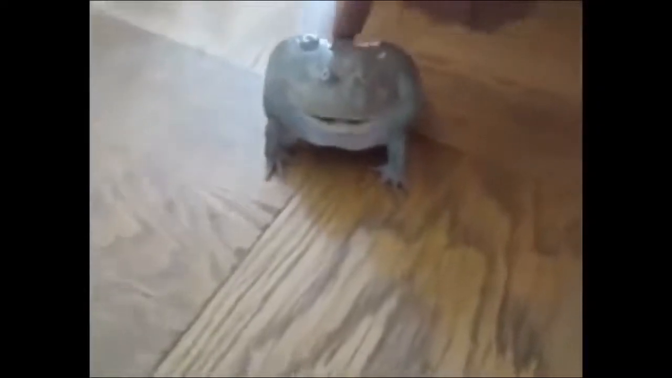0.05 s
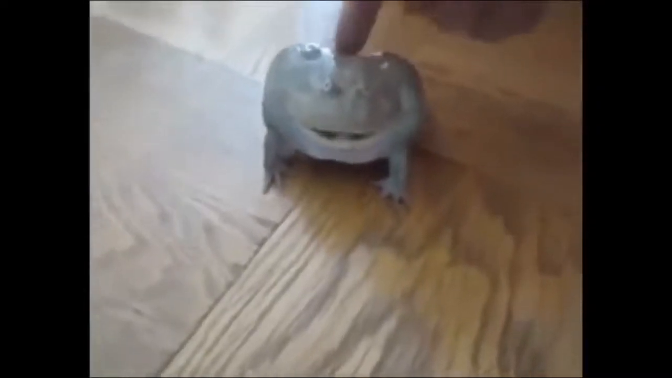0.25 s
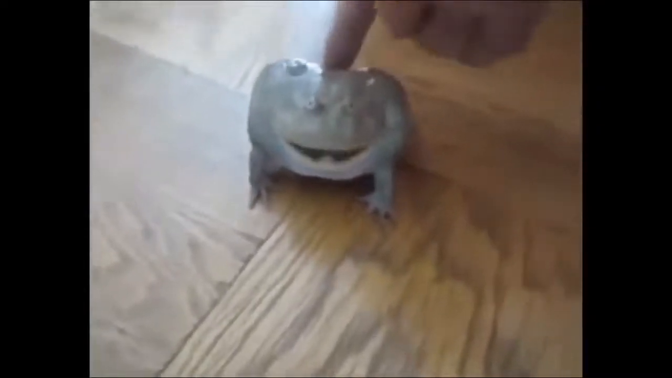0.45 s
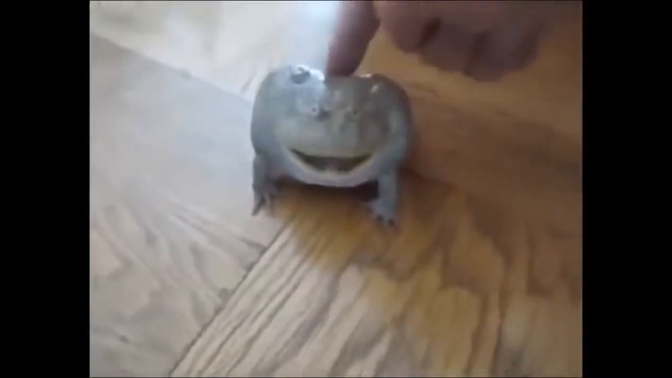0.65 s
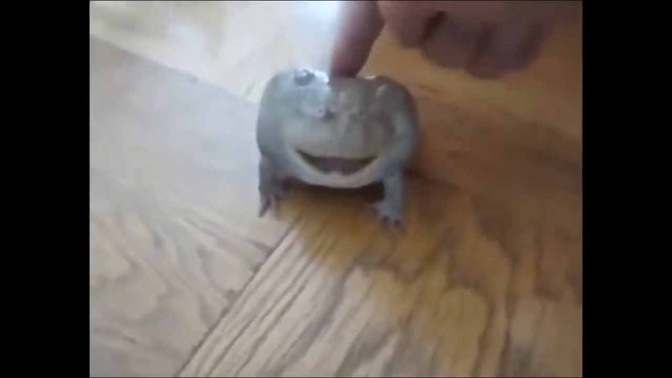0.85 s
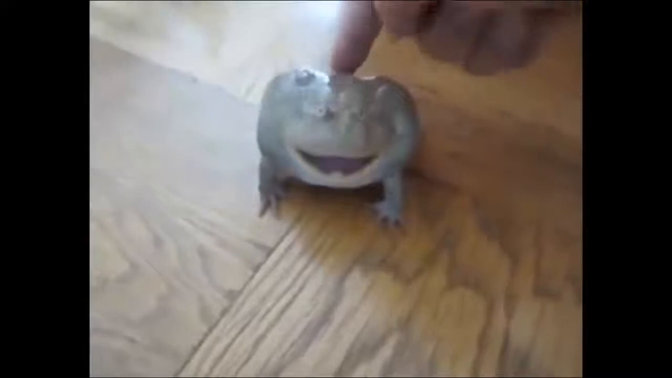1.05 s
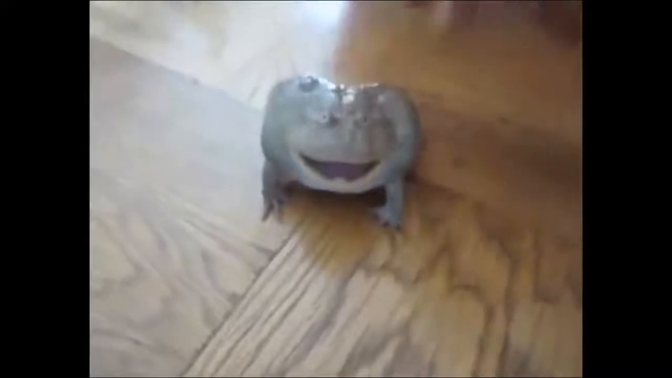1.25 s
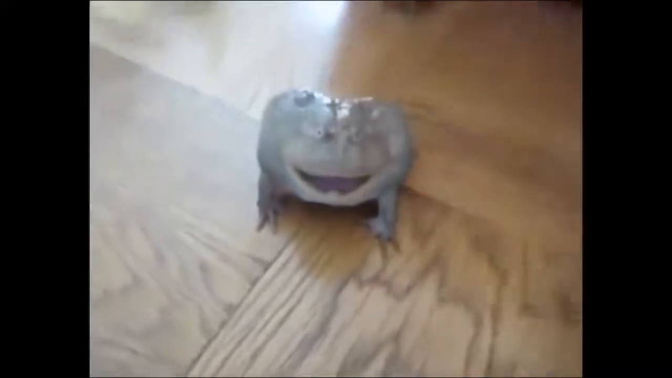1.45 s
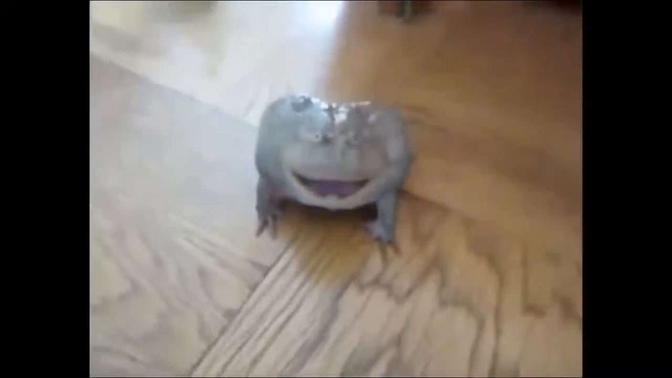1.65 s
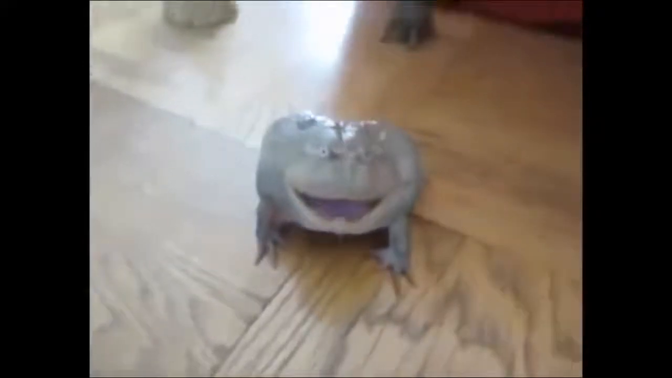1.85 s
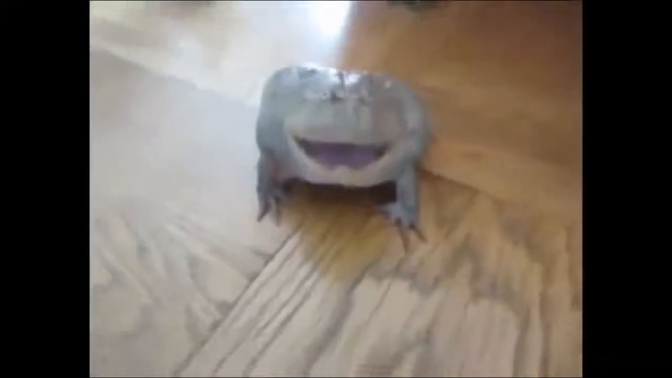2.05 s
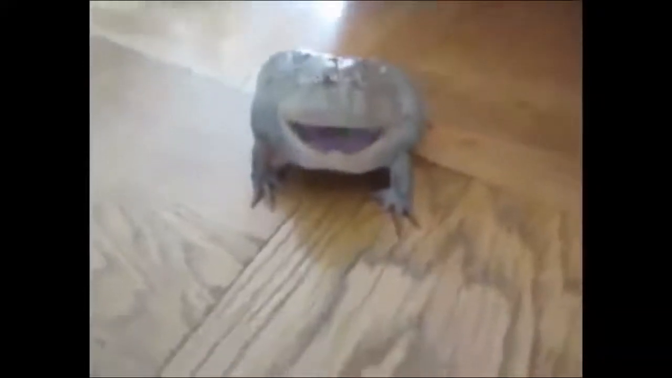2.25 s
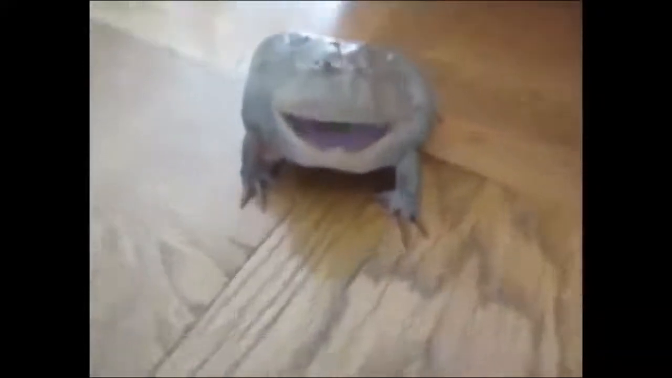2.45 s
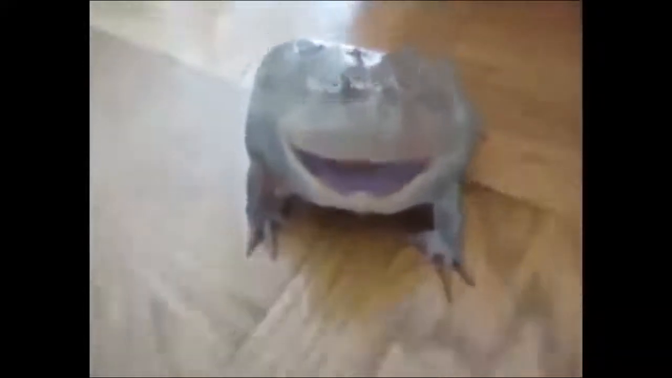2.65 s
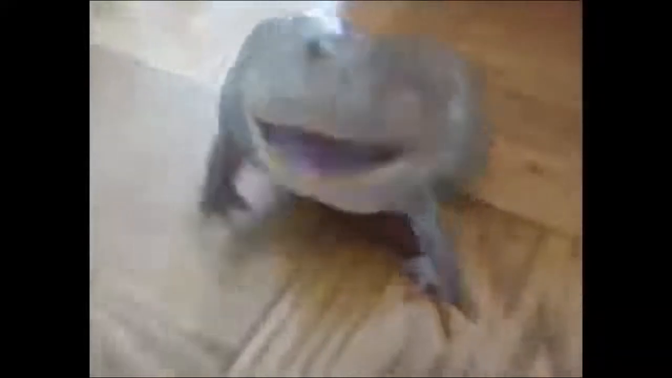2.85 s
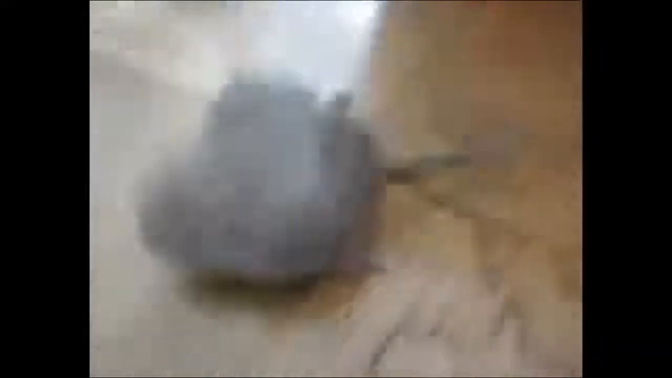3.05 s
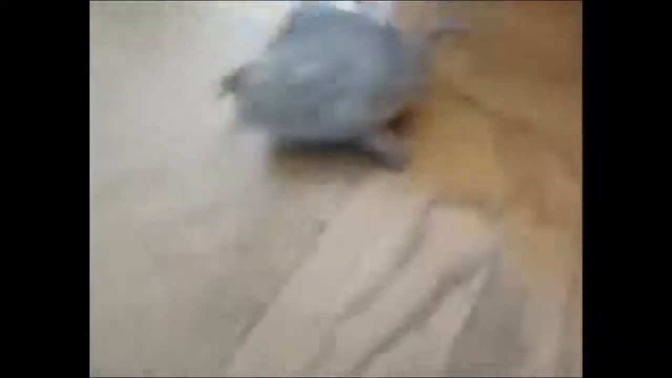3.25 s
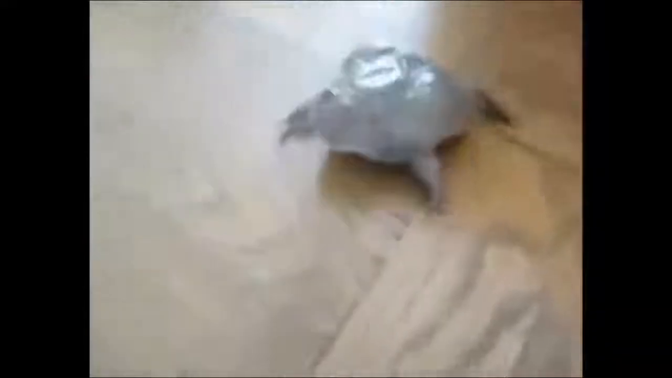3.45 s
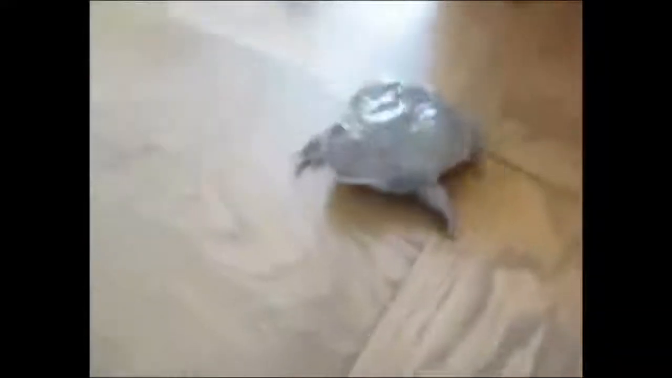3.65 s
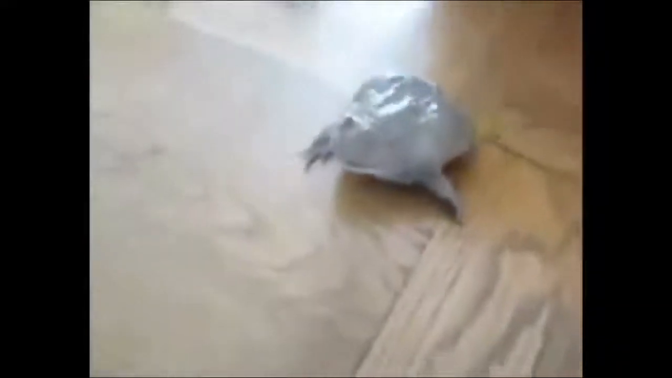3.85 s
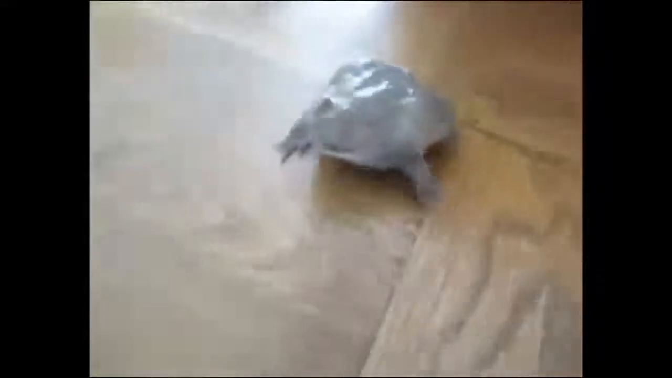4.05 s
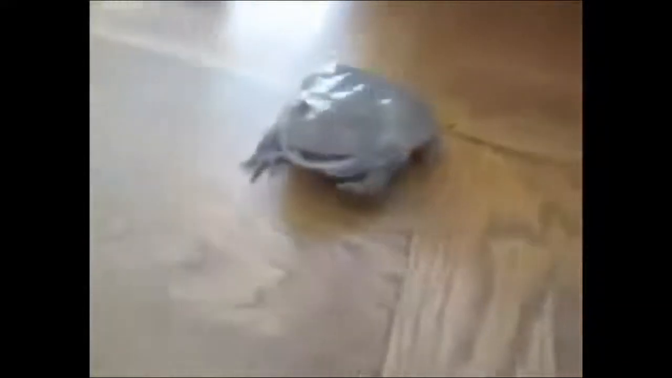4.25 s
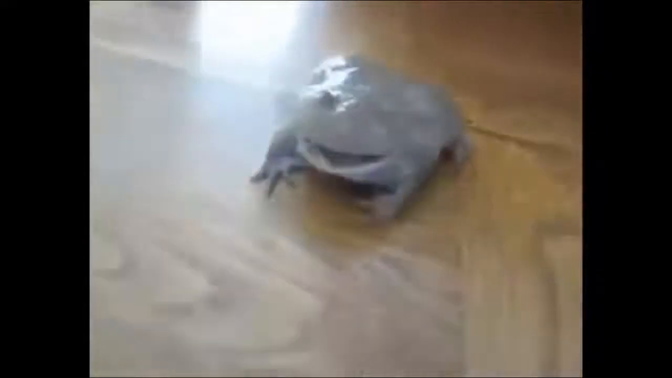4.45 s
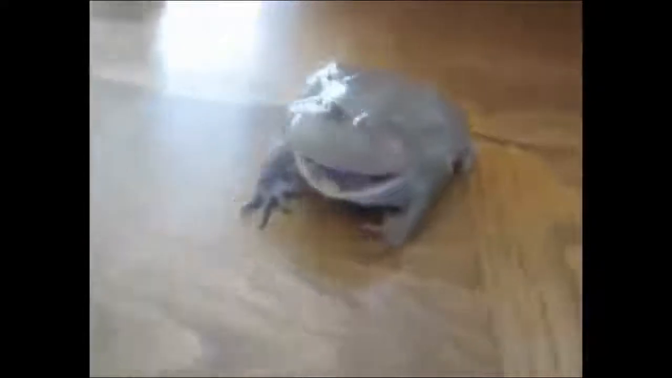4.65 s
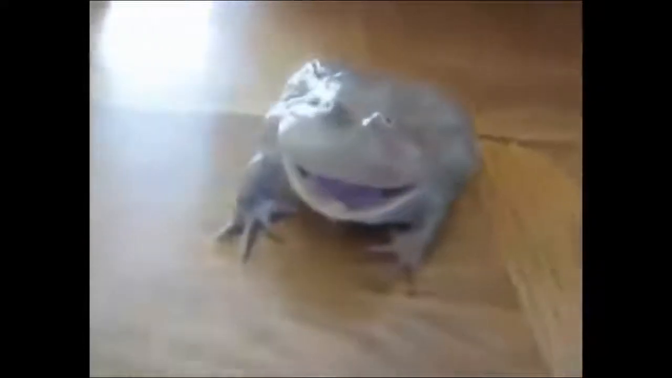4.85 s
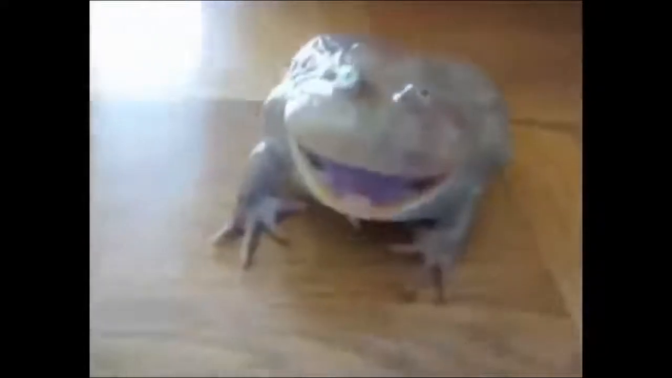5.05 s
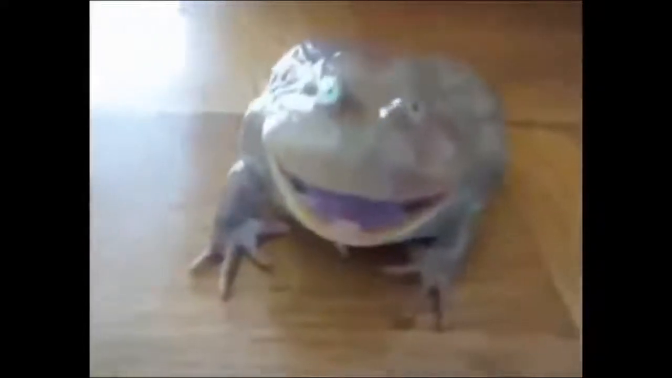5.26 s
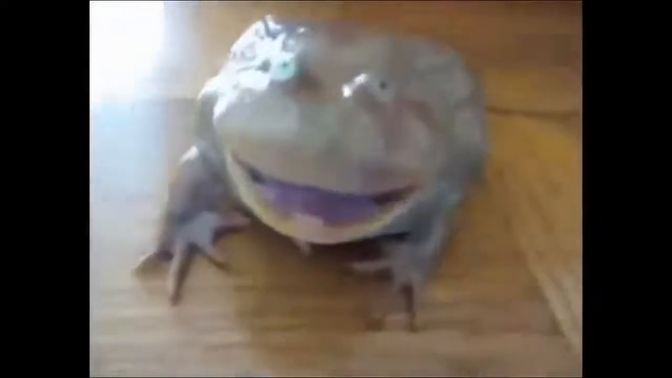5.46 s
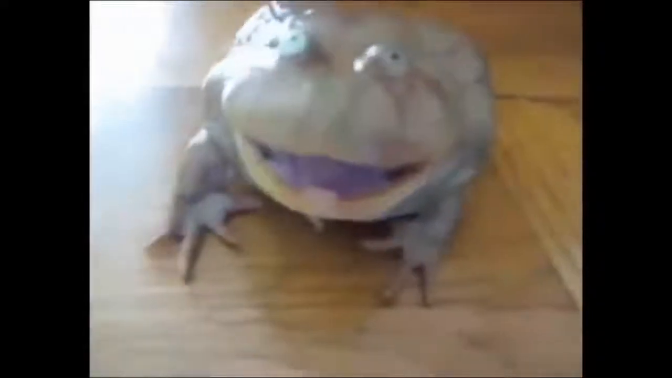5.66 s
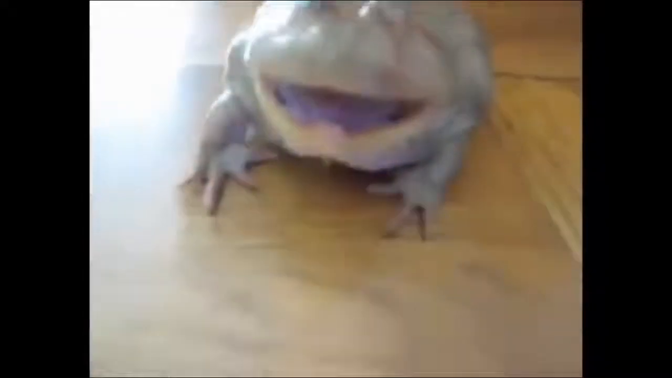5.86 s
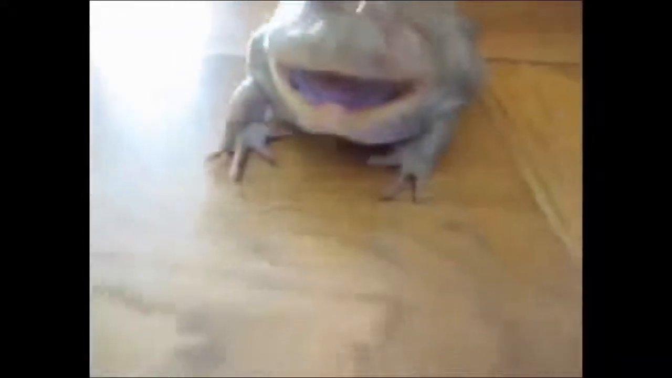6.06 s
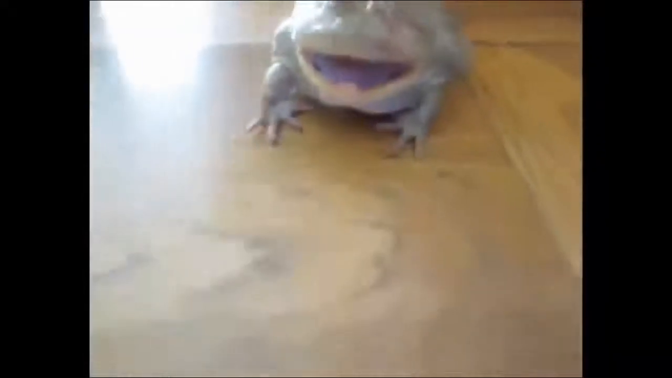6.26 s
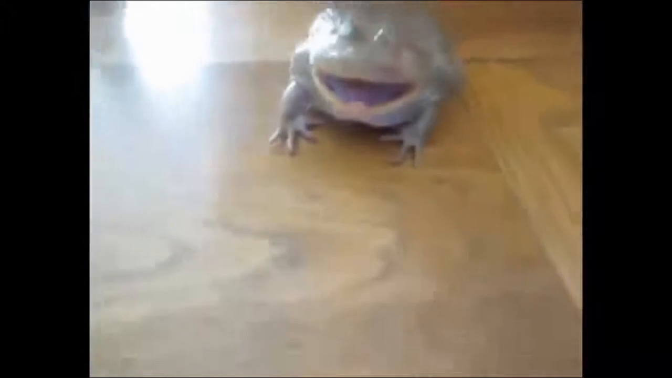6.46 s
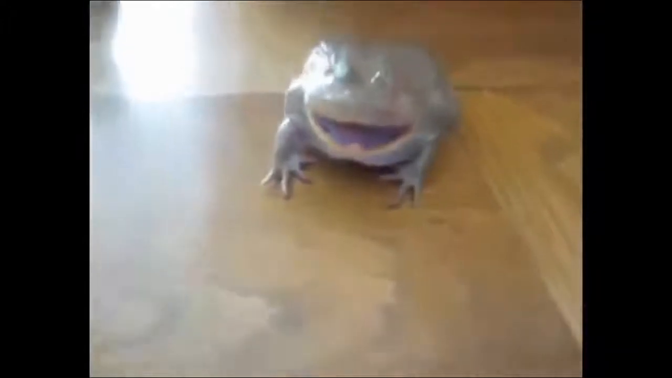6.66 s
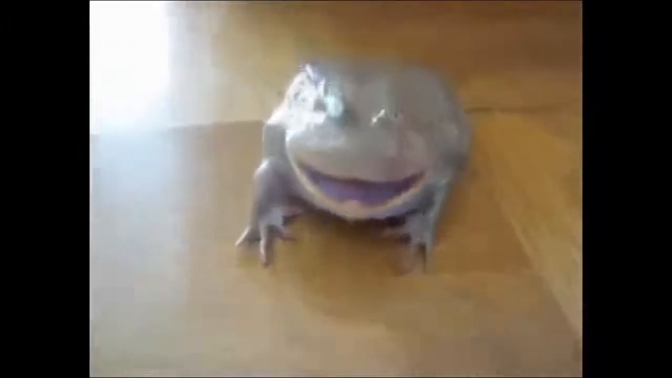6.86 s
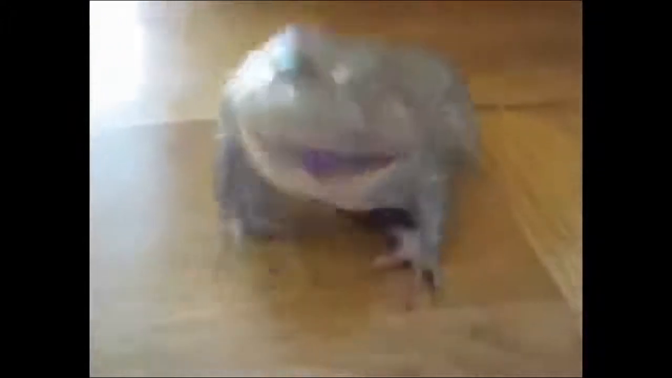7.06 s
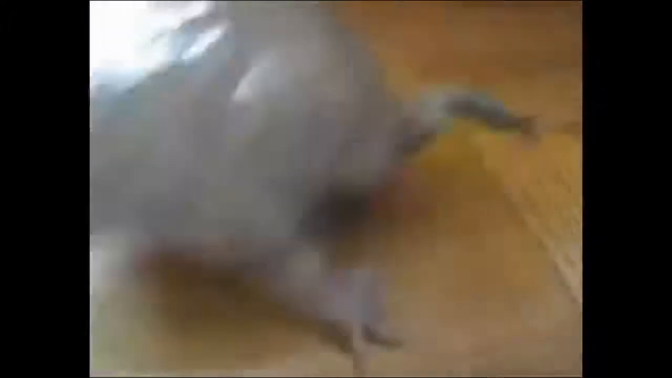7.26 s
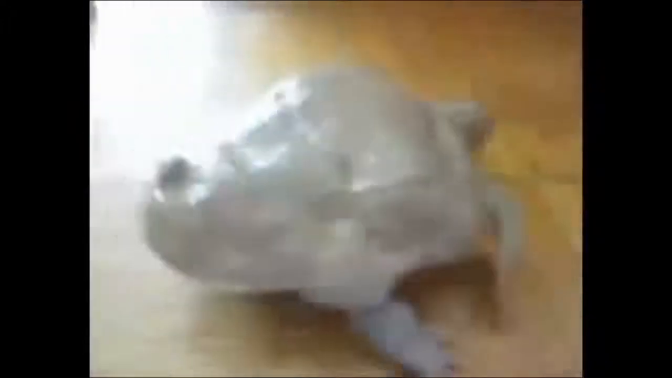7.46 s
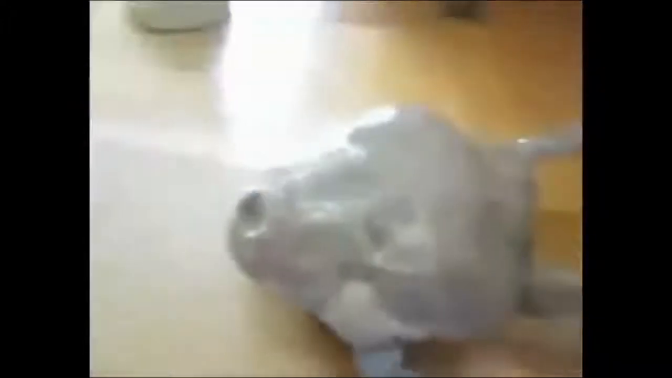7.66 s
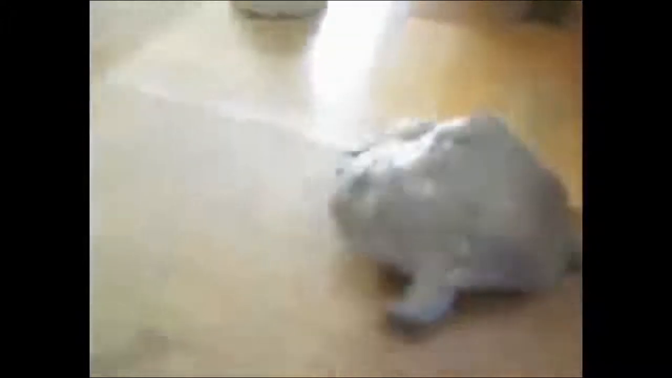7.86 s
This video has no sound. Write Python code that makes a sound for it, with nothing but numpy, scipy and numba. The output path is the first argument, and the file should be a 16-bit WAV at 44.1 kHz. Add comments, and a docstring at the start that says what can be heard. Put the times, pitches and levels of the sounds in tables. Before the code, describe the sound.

Close hand-held microphone in a small, quiet room with a short, dull echo. At 0 s a small clear whimper swells and by 0.05 s bursts into a loud frog scream, gliding upward to a clear squeal until about 0.25 s. It then settles into a harsh, shrill, nasal rasp around 700 Hz, fluttering irregularly about thirty times a second, with brief clear squeaks near 2.4 to 2.7 s. Around 2.9 to 3.3 s, as the frog leaps, the cry jumps higher and its treble suddenly dulls. It stays somewhat muffled while facing away, then brightens from 4 to 4.6 s, gaping and raw, with a steadier half-rough stretch at 5.2 to 5.6 s. Near 7.2 s it darkens and cracks into clearer notes, plunging in pitch and cutting off around 7.6 s. A faint wet foot pat follows at 7.8 s. Soft microphone thuds occur early and around 5 to 5.6 s, over faint rumble and hiss.

```python
"""In a small quiet room a frog on a wooden floor, poked, screams for over seven seconds, leaps once and turns.
Its vocal folds snap shut some 750 times a second, mostly irregularly, in throbs of about 30 a second;
now and then they hold a pitch, clear or rough. The snaps excite the resonances of its wide mouth, whose
colour changes as it turns, until its air runs out. A foot then pats the floor. Soft bumps reach the
hand-held microphone, over faint rumble and hiss."""
import sys
import numpy as np
from scipy import signal
from scipy.fft import rfft, irfft
from scipy.io import wavfile
from scipy.ndimage import uniform_filter1d
from numba import njit

SR = 44100
rng = np.random.default_rng(int(sys.argv[2]) if len(sys.argv) > 2 else 0)


def file_out(sig):
    """Save sig as 16-bit WAV at sys.argv[1]."""
    # one column per channel
    cols = np.atleast_2d(sig).T
    # limit, then scale
    lim = np.clip(cols, -1, 1)
    pcm = np.round(lim * 32767).astype(np.int16)
    wavfile.write(sys.argv[1], SR, pcm)


N = 348831
TIME = np.arange(N) / SR  # seconds
BURST_S = .053  # a whimper bursts into the scream


def scream():
    """Source and filter: folds excite the mouth; three bands share one attack, the notes' lifts and the fade."""
    # Basic rate of the vocal folds. Each row: time in seconds, pitch in Hz.
    pitch_points = [(.04, 559.6), (.11, 775), (.195, 848.3), (.25, 851), (.27, 698.9), (2.76, 690.8),
                    (2.95, 879), (3.32, 830.3), (3.9, 646.2), (4.95, 756.5), (5.65, 679.2), (7.16, 736),
                    (7.3, 663.7), (7.51, 679.7), (7.56, 512), (7.605, 439), (7.65, 75.3), (7.72, 44.6)]
    # Level of the lows. Each row: time in seconds, level in dB.
    low_level = [(.25, -29), (.38, -33.5), (.8, -40.5), (2.7, -44), (3.1, -39.5), (3.35, -47), (4.4, -38),
                 (6.5, -41), (7.3, -40.5), (7.45, -42.5)]
    # How hard the frog pushes, heard in the midrange. Each row: time in seconds, level in dB.
    effort = [(.07, -33.5), (.25, -25.5), (.4, -28), (.75, -32.5), (1.2, -31), (2.6, -31.5), (3.0, -26.5),
              (3.11, -29.5), (3.8, -30), (4.1, -33), (4.6, -29.5), (5.65, -32), (7.05, -31.5), (7.32, -35),
              (7.45, -32.5)]
    # Level of the treble, which drops while the mouth points away. Each row: time in seconds, level in dB.
    treble_level = [(.04, -37.5), (.12, -30), (2.971, -30), (3.24, -57.5), (3.4, -46), (3.9, -37),
                    (4.601, -26), (5.6, -27.5), (6.45, -34), (7.1, -29), (7.33, -35), (7.42, -46.5)]
    whimper_db, attack_s = -9, 0.006
    spent_s, fade_db_per_s = 7.479, 153.5  # the air runs out

    rough, ratio, lift_db = notes()
    source = folds(rough, curve(pitch_points) * ratio)
    voice = head_movement(turning_mouth(source))

    attack_db = whimper_db * np.clip(1 - (TIME - BURST_S) / attack_s, 0, 1)
    fade_db = -fade_db_per_s * np.maximum(TIME - spent_s, 0)
    shared_db = attack_db + lift_db + fade_db

    low = lowpass(voice, 1442)
    low_and_middle = lowpass(voice, 3930)
    bands = [low, low_and_middle - low, voice - low_and_middle]
    total = np.zeros(N)
    for band, level in zip(bands, (low_level, effort, treble_level)):
        running_rms = np.sqrt(smooth(band ** 2, 0.26) + 1e-12)
        total += undb(curve(level) + shared_db) * band / running_rms
    return total


def folds(rough, pitch, jitter=.16, scatter_db=5.0, throb_lift=.26, throb_order=0.65,
          hiss_db=-13, clear_hiss_db=-29, waver=.02):
    """Self-oscillation under pressure: each throb makes the snaps faster, stronger and more even; air hisses."""
    strong, between = throbbing(pitch)
    throb = strong + between * np.minimum(2 * rough, 1)  # a clear note holds steady
    rough = rough / (1 + throb_order * throb)
    hz = pitch * (1 + throb_lift * np.tanh(throb))
    hz = hz * np.exp(waver * np.sqrt(rough) * wander(.005))
    clicks = snaps(hz, jitter * rough, scatter_db * rough, snap_chance(count=N // 20))
    air_gain = undb(hiss_db) * rough + undb(clear_hiss_db)
    air = air_gain * rng.standard_normal(N)
    return (unit(clicks) + air) * (1 + throb)


@njit
def snaps(hz, jitter, scatter_db, chance):
    """Pulse excitation: a band-limited click per cycle of the folds, each with its own length and size."""
    out, at, k = np.zeros(len(hz)), 8., 0
    while at < len(hz) - 9:
        i = int(at)
        size = 10 ** (scatter_db[i] * chance[k, 1] / 20)
        for j in range(i - 7, i + 9):
            window = .5 + .5 * np.cos(np.pi * (j - at) / 8)
            out[j] += size * np.sinc(j - at) * window
        at += SR / hz[i] * np.exp(jitter[i] * chance[k, 0])
        k += 1
    return out


def snap_chance(count, falter=0.32, falter_spread=0.62, full=0.62, full_spread=0.44):
    """Irregular subharmonics: a full snap every two to four cycles, faltering ones between.

    Columns: length and size of each cycle, in spreads.
    """
    length, size = np.clip(rng.standard_normal((count, 2)), -2, 2).T
    is_full = np.isin(np.arange(count), np.cumsum(rng.integers(2, 5, count)))
    size = np.where(is_full, full + full_spread * size, falter_spread * size - falter)
    return np.column_stack([length, size])


def throbbing(pitch, rise_s=.003, fall_s=.009, early_s=.01, weak=.9, skew=1.8):
    """Amplitude modulation by pulsed airflow: weaker throbs of random size keep up the beat between strong ones."""
    # Strong throbs of air, single (length 0) or in a run.
    # Each row: start in seconds, length in seconds, lift in dB.
    throb_runs = [(.489, 0, 8.5), (.617, 0, 7), (.712, 0.0023, 9), (0.9, 0.061, 7), (1.063, 0, 9.5),
                  (1.161, 0.041, 8), (1.258, 0.0012, 10), (1.455, 0.095, 8.5), (1.687, 0.021, 8.5),
                  (1.814, 0.14, 6.5), (2.178, 0.0031, 7), (2.311, 0.065, 6), (2.549, 0.13, 6),
                  (2.746, .16, 6), (2.954, 0.12, 6), (3.139, 0, 9), (3.198, 0, 7.5), (3.212, .084, 6.5),
                  (3.468, 0.032, 6.5), (3.552, 0.034, 8.5), (3.67, 0, 8.5), (3.768, 0.037, 9.5),
                  (3.996, 0, 10), (4.271, 0, 7), (4.411, 0.00063, 8), (4.537, 0.1, 6.5), (5.073, 0, 6.5),
                  (5.188, 0.076, 6), (5.366, 0.074, 6.5), (5.562, 0.028, 7), (5.821, 0.0023, 7.5),
                  (6.134, .036, 6), (6.245, 0, 7), (6.501, 0.061, 7.5), (6.722, 0.0027, 8.5),
                  (6.866, 0.17, 5.5), (7.233, 0.03, 7)]
    throbs = []
    for start, length, db in throb_runs:
        throbs += [(t, db) for t in beats(start, start + length, pitch)]
    strong = sum((undb(db) - 1) * swell(t, rise_s, fall_s) for t, db in throbs)

    times = [BURST_S] + [t for t, db in throbs]
    fill = np.concatenate([beats(a, b, pitch)[1:-1] for a, b in zip(times, times[1:])])
    between = np.zeros(N)
    for t, (size, early) in zip(fill, rng.uniform(0, 1, (len(fill), 2))):
        between += weak * size ** skew * swell(t - early_s * early, rise_s, fall_s)
    return strong, between


def beats(start, end, pitch):
    """A power law ties throb rate to pitch; times are spaced evenly from start to end."""
    throbs_per_s, reference_hz, power = 30, 700, .5  # the rate holds at the reference pitch
    middle_pitch = np.interp((start + end) / 2, TIME, pitch)
    rate = throbs_per_s * (middle_pitch / reference_hz) ** power
    return np.linspace(start, end, max(int(round((end - start) * rate)), 0) + 1)


def notes(lock_s=.009, glide_s=.008):
    """Mode locking: the folds slip into and out of each held pitch; gives roughness, pitch ratio, lift dB."""
    # Stretches of held pitch, from clear notes to half-rough or fully rough cries, some a register higher.
    # Each row: start in seconds, end in seconds, roughness from 0 to 1, pitch ratio, lift in dB.
    held_pitches = [(.01, 0.054, 0.15, 1.063, -3.5), (0.102, 0.237, 0.06, 0.99, 2.5),
                    (.242, 0.255, 0.17, 1.09, 6.5), (0.363, .39, 0.03, 1.29, -4.5),
                    (2.408, 2.449, 0.09, 1.01, -1.5), (2.508, 2.542, 0.14, 1.04, 4.5),
                    (2.702, 2.748, 0.1, 0.99, 0.5), (2.859, 2.95, 0.52, 0.92, 3),
                    (2.953, 3.126, 0.31, 1.344, 1.5), (3.127, 3.212, 1, 1.3, 4),
                    (3.213, 3.288, 0.34, 1.37, 13.5), (3.288, 3.319, 0.62, 1.3, 6),
                    (3.322, 3.46, .55, 1, 2), (5.151, 5.653, 0.51, 1, 0.5), (7.189, 7.228, 0, 0.99, 2.5),
                    (7.298, 7.525, 0.5, 1.05, 0), (7.316, 7.361, 0.07, 0.95, 0.5),
                    (7.414, 7.45, 0.06, 0.94, 4.5), (7.522, 7.611, 0.15, 0.9, 4.5)]
    sharp, settle_s = .04, .012  # a note starts sharp by this share, before the glide, and settles
    rough = np.clip(1 + .25 * wander(.015), .3, 1.4)
    ratio, lift_db = np.ones(N), np.zeros(N)
    for start, end, *note in held_pitches:
        held = (TIME > start) & (TIME < end)
        rough[held], ratio[held], lift_db[held] = note
        ratio[held] *= 1 + sharp * np.exp(-(TIME[held] - start) / settle_s)
    return smooth(rough, lock_s), smooth(ratio, glide_s), smooth(lift_db, glide_s)


def turning_mouth(source):
    """A time-varying filter: crossfades carry the voice from each pose's resonances to the next."""
    # Resonances of the mouth over the floor, a table for each pose.
    # Each row: centre in Hz, width in Hz, level in dB.
    opening = [(800, 800, -22.5), (1480, 1300, -2), (3010, 1100, 3.5), (4240, 2300, -0.5),
               (9000, 1740, -5.5)]
    facing = [(647, 700, -8), (1226, 220, 3), (1835, 360, -0.5), (2580, 980, -6), (4074, 555, 4),
              (4850, 850, 5), (5870, 1470, -1), (8420, 360, 1.5), (9790, 1560, -1)]
    leaping = [(1300, 1000, -40.5), (1820, 170, -4.5), (2659.5, 1100, -5), (4120, 740, 3.5),
               (6910, 870, -1.5), (8570, 280, -8), (11100, 4000, -16.5)]
    landing = [(1150, 740, -57), (2380, 550, 1), (3900, 530, -31.5), (6400, 5000, -16.5)]
    away = [(775, 360, -10), (1850.4, 990, 1), (2490, 1126, 1.5), (3500, 560, -2), (6600, 1400, -14),
            (9500, 1100, -14)]
    close = [(720, 170, -2.5), (1420.6, 870, 5), (1820, 280, 3), (2340, 260, 3.5), (3084, 620, 1),
             (4480, 730, 3), (6280, 1380, -0.5), (8360, 280, -15.5), (10650, 850, -11.5),
             (12030, 1260, -16.5)]
    gaping = [(700.4, 250, -2.5), (1380, 650, 5.5), (1765, 220, 8.5), (2930, 1500, 0.5), (4450, 870, 3),
              (6590, 1430, -1.5), (8570, 1000, -9), (10460, 1150, -10.5), (13000, 1400, -29)]
    leaving = [(773, 300, -9), (1291, 560, 0.5), (2000, 1100, -1), (2610, 264, 3.5), (3202, 800, 0),
               (8100, 4100, -16.5)]
    # Turns from each pose to the next. Each row: start in seconds, end in seconds.
    turns = [(.2, 0.32), (2.72, 2.97), (3.14, 3.22), (3.28, 3.33), (3.62, 4.15), (5.751, 6.15),
             (7.29, 7.39)]
    voice = mouth(source, opening)
    for (start, end), pose in zip(turns, [facing, leaping, landing, away, close, gaping, leaving]):
        progress = np.clip((TIME - start) / (end - start), 0, 1)
        voice = voice + progress * (mouth(source, pose) - voice)
    return voice


def mouth(x, resonances, cutoff_hz=570, size=2048):
    """Minimum-phase resonance; so small a mouth radiates almost nothing under its cut-off."""
    hz = np.arange(size // 2 + 1) * SR / size
    power = np.zeros(len(hz))
    for centre, width, db in resonances:
        power += undb(db) ** 2 / (1 + ((hz - centre) / width * 1.067) ** 2) ** 3
    power = power * (1 / (1 + (cutoff_hz / (hz + 1)) ** 14) + undb(-27.0))
    # folding the cepstrum onto positive times makes the response causal
    cepstrum = irfft(np.log(power) / 2)
    cepstrum[1:size // 2] *= 2
    cepstrum[size // 2 + 1:] = 0
    response = irfft(np.exp(rfft(cepstrum)))[:size // 2]
    return signal.oaconvolve(x, response)[:N]


def head_movement(voice):
    """Moving resonance and interference: a sharp ring wavers with the gape, a gap drifts through the spectrum."""
    # The mouth's sharpest resonance, shifting with the gape.
    # Each row: time in seconds, centre in Hz before the waver, lift in dB.
    ring_path = [(.3, 1690, 6.5), (2.5, 1900, 5.5), (3.1, 1851, -0.5), (4.0, 1648, 3.5), (5.1, 1692, 5.5),
                 (5.5, 1570, 3), (7.1, 1684, 8), (7.28, 1748, -8)]
    # A gap, likely where the echo off the floor cancels the voice, moving with the head.
    # Each row: time in seconds, centre in Hz, depth from 0 to 1.
    gap_path = [(.3, 2170, 0.6), (2.6, 2150, 0.34), (3.2, 2588, .02), (3.8, 2900, 0.27), (4.15, 3213, .8),
                (4.55, 3527, .85), (5.6, 3409, .9), (6.1, 3830, 0.74), (7.05, 3723, 0.63),
                (7.3, 2710, 0.01)]
    ring_width_hz, gap_width_hz = 206.0, 780.0
    ring_hz = curve(ring_path) * np.exp(0.049 * wander(seconds=0.049))
    ring_gain = undb(curve(ring_path, axis=2)) - 1
    voice = voice + ring_gain * sweep(voice, ring_hz, ring_width_hz)
    depth = np.clip(curve(gap_path, axis=2), 0, 1)
    return voice - depth * sweep(voice, curve(gap_path), gap_width_hz)


@njit
def sweep(x, hz, width):
    """A state-variable resonator: a band-pass whose centre moves, with gain 1 there."""
    out, band, low = np.empty(len(x)), 0., 0.
    for i in range(len(x)):
        g, k = np.tan(np.pi * hz[i] / SR), width / hz[i]
        v = (band + g * (x[i] - low)) / (1 + g * (g + k))
        band, low, out[i] = 2 * v - band, low + 2 * g * v, k * v
    return out


def foot_tap(start_s=7.826, level_db=-53.5, top_hz=4500):
    """Impact noise: a wet foot pats the floor, a short burst without much treble."""
    noise = unit(lowpass(rng.standard_normal(N), top_hz, order=2))
    return undb(level_db) * swell(start_s, 0.00057, 0.0043) * noise


def room(x, t60=0.12, wet_db=-16, dull_hz=4500):
    """Diffusion and reverberation: things close by smear each snap uncoloured; walls add a short, dull tail."""
    for lag in (9, 23, 47):  # samples
        allpass = np.r_[.3, np.zeros(lag - 1), 1]
        x = signal.lfilter(allpass, allpass[::-1], x + 1e-18)
    age = TIME[:SR // 2]
    tail = lowpass(rng.standard_normal(len(age)), dull_hz, order=1)
    tail = tail * undb(-60 * age / t60) * (age > .005)
    return x + undb(wet_db) * signal.oaconvolve(x, tail / np.linalg.norm(tail))[:N]


def bumps(modes=((75, 55, 0), (240, 90, -2), (400, 70, -3)), fall_s=0.083):
    """Modal excitation: rubbing in soft thuds rings the microphone's case.

    Each mode: centre in Hz, width in Hz, level in dB.
    """
    # Bumps on the microphone. Each row: start in seconds, level in dB.
    bump_times = [(0, -43), (.12, -51.5), (.38, -46.5), (0.599, -49.5), (0.669, -48), (1.689, -52),
                  (5.0, -50.5), (5.186, -46.5), (5.565, -49)]
    rub = rng.standard_normal(N)
    case = np.zeros(N)
    for hz, width, db in modes:
        ringing = signal.lfilter(*signal.iirpeak(hz, hz / width, fs=SR), rub)
        case += undb(db) * unit(ringing)
    thuds = sum(undb(db) * swell(t, 0.0008, fall_s) for t, db in bump_times)
    return lowpass(case, 970) * thuds


def room_tone(level_db=-64.5):
    """Stationary coloured noise: faint steady rumble and hiss, shaped in the spectrum."""
    # Colour of the room's noise. Each row: frequency in Hz, relative density in dB per Hz.
    tone_colour = [(18, -52.5), (30, -10.5), (109, -10), (311, -16.5), (336, -18.5), (1980, -21),
                   (5690, -32.5), (14000, -40)]
    hz, db = np.transpose(tone_colour)
    noise = rfft(rng.standard_normal(N))
    noise_hz = np.arange(len(noise)) * SR / N
    colour = undb(np.interp(np.log(noise_hz + 1), np.log(hz), db))
    return undb(level_db) * unit(irfft(noise * colour, N))


def curve(points, axis=1):
    """Linear interpolation of one column of rows that begin with a time in seconds."""
    columns = np.transpose(points)
    return np.interp(TIME, columns[0], columns[axis])


def wander(seconds):
    """Low-passed noise: a smooth random drift of rms 1."""
    return unit(smooth(rng.standard_normal(N), seconds))


def swell(start, rise, fall):
    """A transient envelope: a quick rise to 1 and a rounded fall, all in seconds."""
    age = TIME[:int(8 * fall * SR)]
    shape = np.minimum(age / rise, 1) * np.exp(-(np.maximum(age - rise, 0) / fall) ** 1.5)
    out, first = np.zeros(N), max(int(start * SR), 0)
    out[first:first + len(shape)] = shape[:N - first]
    return out


def smooth(x, seconds):
    """A triangular moving average, made by two equal box averages."""
    size = max(int(seconds * SR), 1)
    return uniform_filter1d(uniform_filter1d(x, size), size)


def lowpass(x, hz, order=4):
    """Zero-phase low-pass: filtering both ways cancels the delay."""
    return signal.sosfiltfilt(signal.butter(order, hz, fs=SR, output="sos"), x)


def unit(x):
    """Normalisation to rms 1."""
    return x / np.sqrt(np.mean(x ** 2))


def undb(db):
    """Amplitude ratio of a level in dB."""
    return 10 ** (np.asarray(db) / 20)


def scene():
    """Superposition: voice and foot tap sound in the room; bumps and room tone add directly."""
    voice = scream() * np.minimum(TIME / 0.0011, 1)  # the first whimper swells from nothing
    return (room(voice + foot_tap()) + bumps() + room_tone())[None]


def record(dry):
    """Band limiting: the recorder steeply cuts everything above 15 kHz."""
    return signal.sosfilt(signal.ellip(10, .2, 80, 15000, fs=SR, output="sos"), dry)


dry = scene()
out = record(dry)
file_out(out)
```